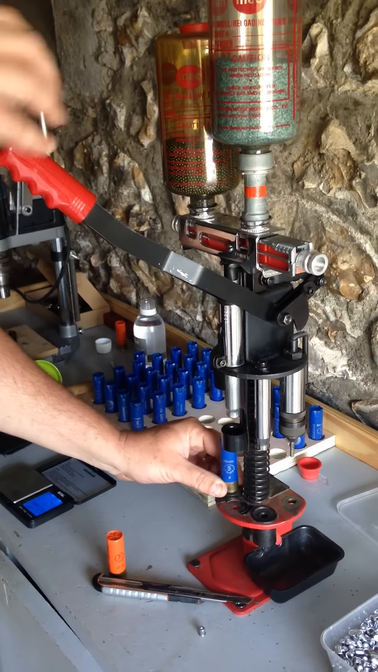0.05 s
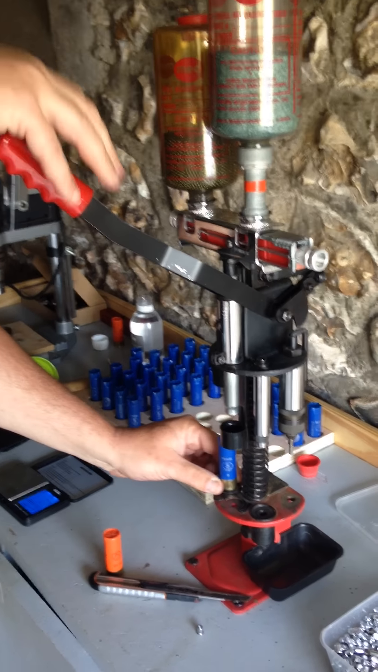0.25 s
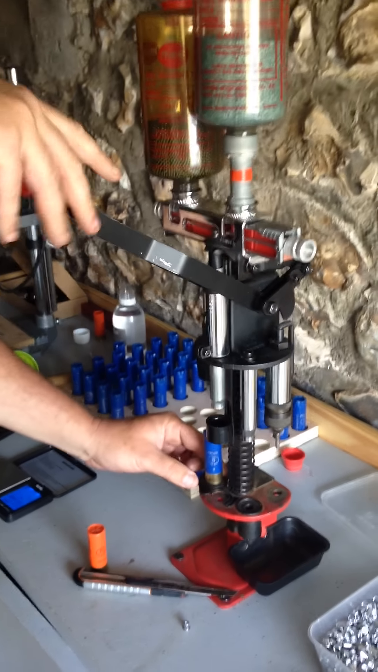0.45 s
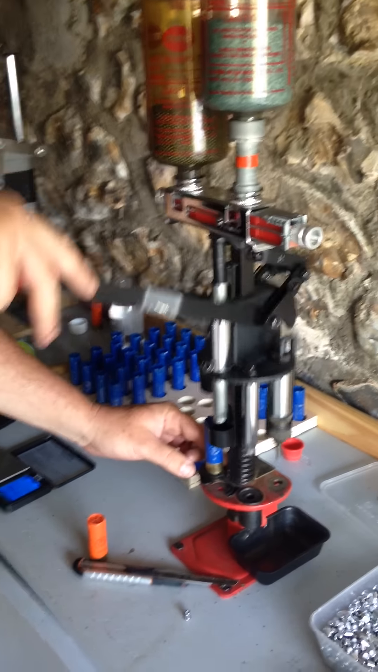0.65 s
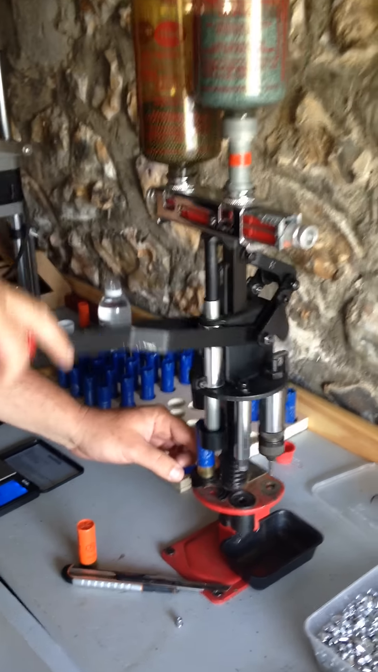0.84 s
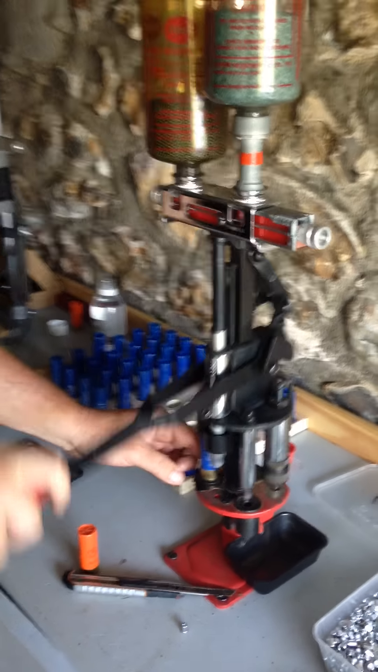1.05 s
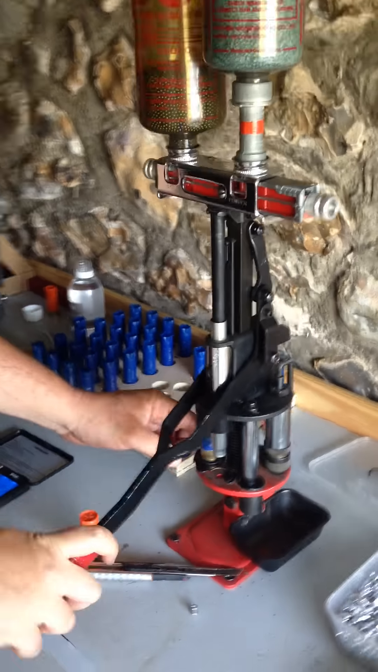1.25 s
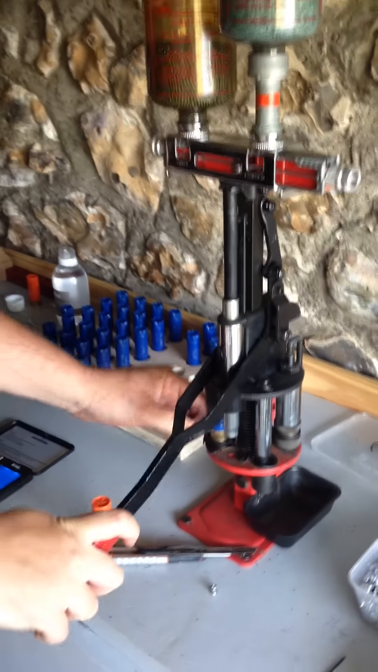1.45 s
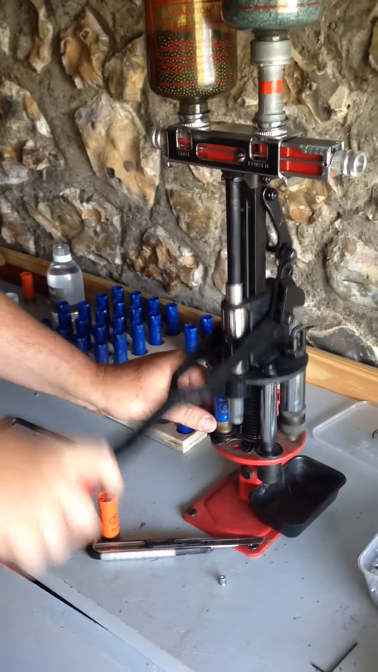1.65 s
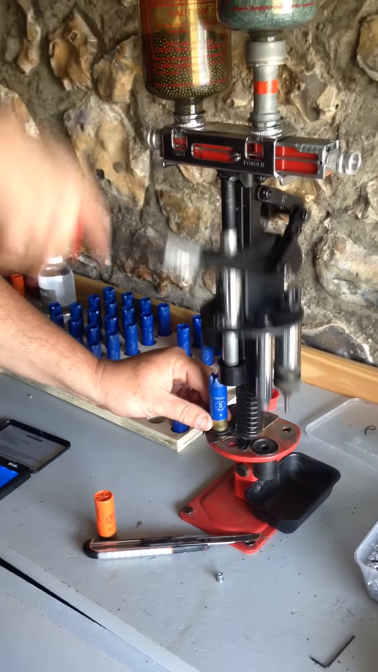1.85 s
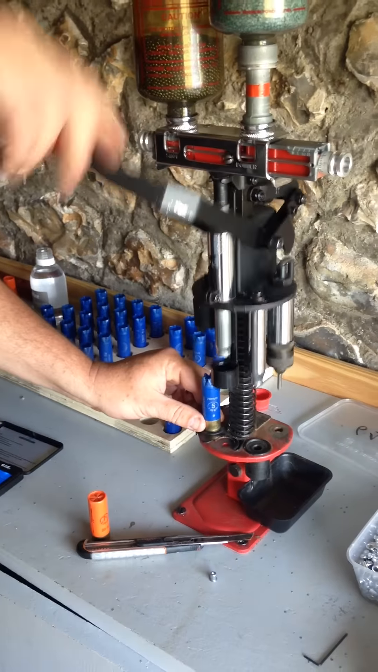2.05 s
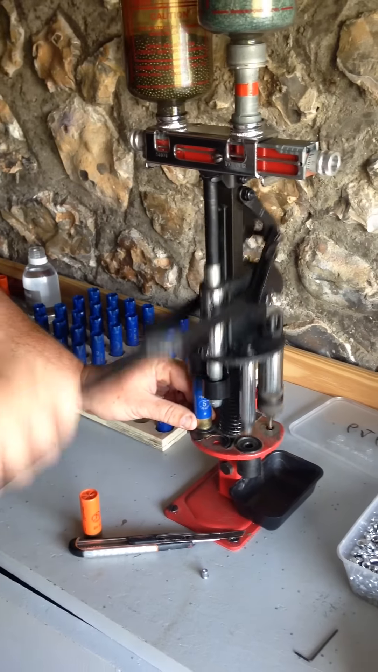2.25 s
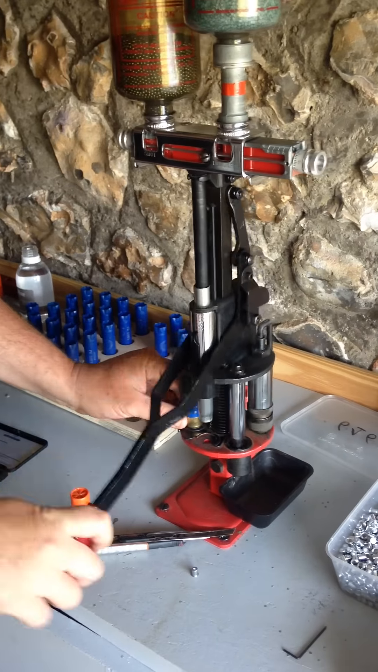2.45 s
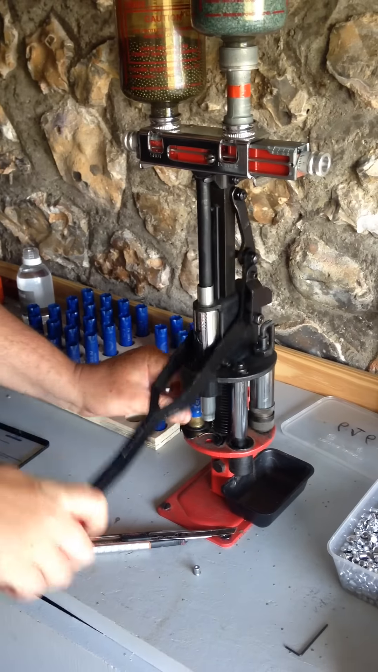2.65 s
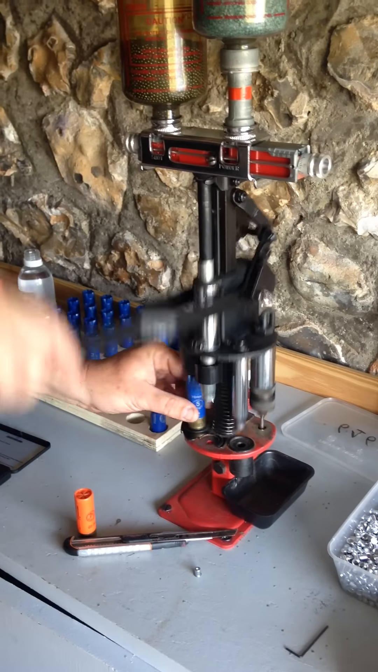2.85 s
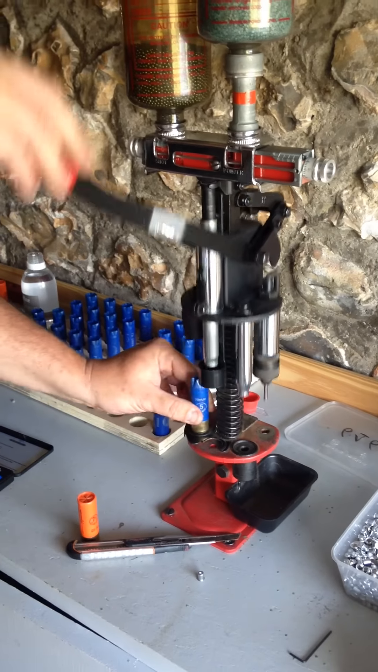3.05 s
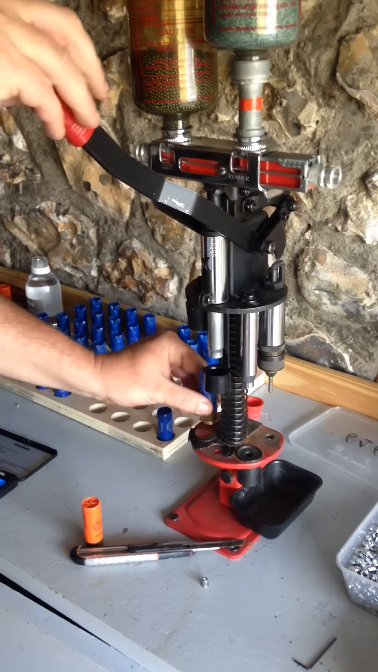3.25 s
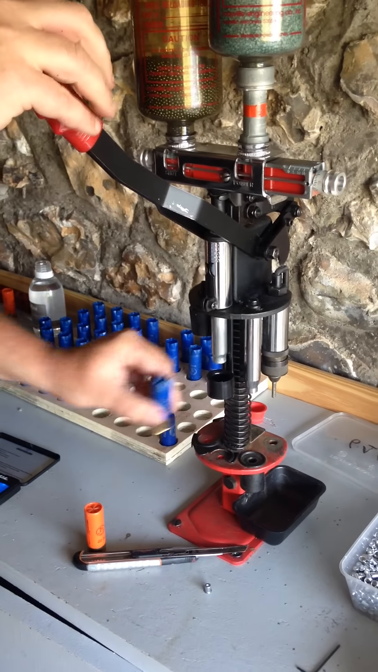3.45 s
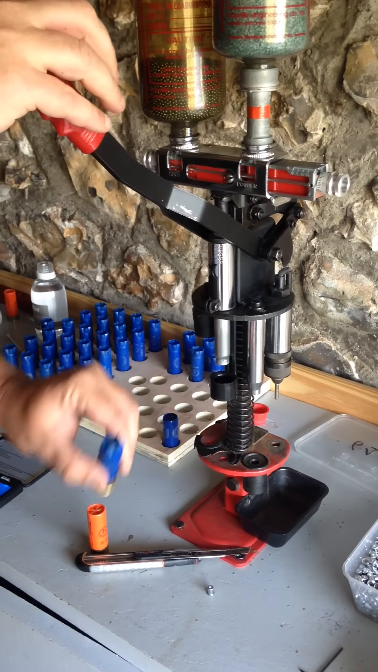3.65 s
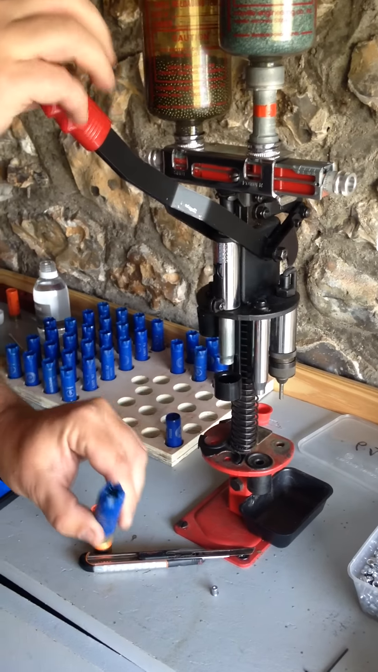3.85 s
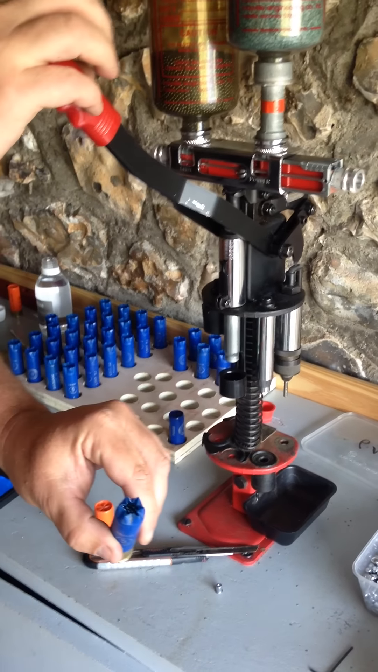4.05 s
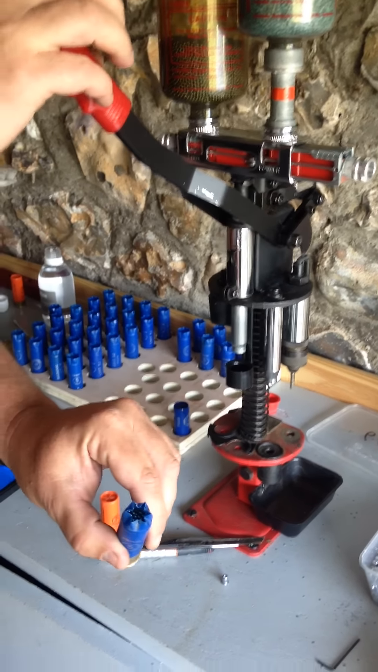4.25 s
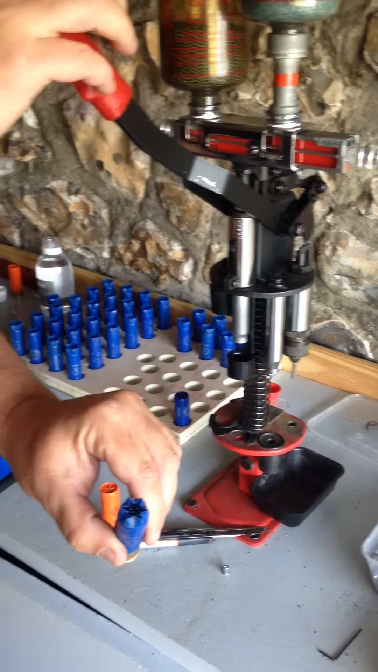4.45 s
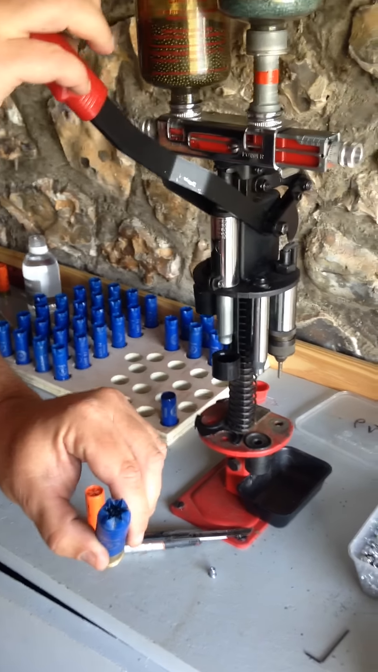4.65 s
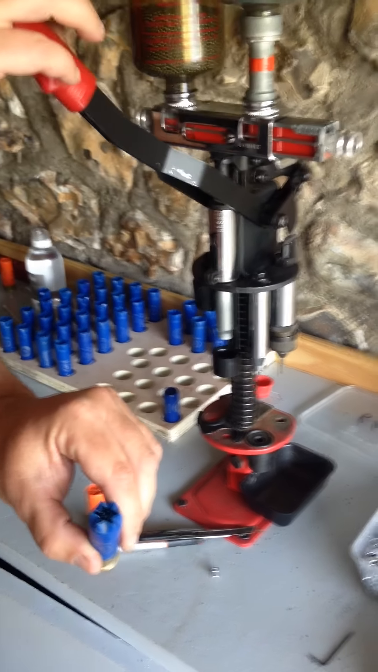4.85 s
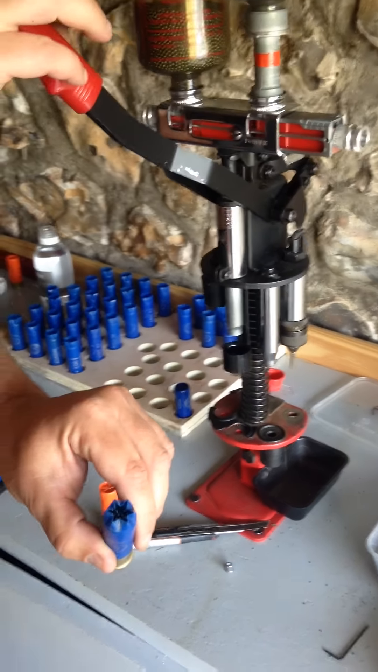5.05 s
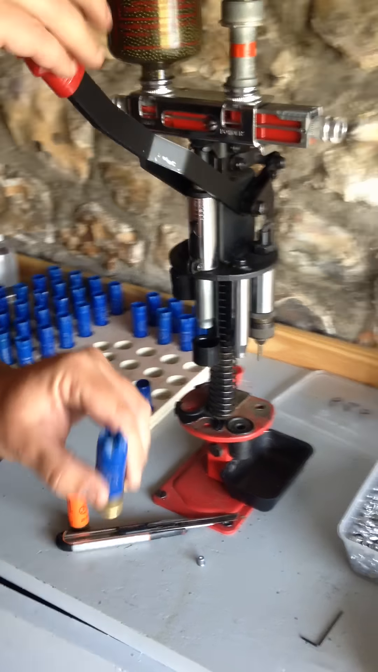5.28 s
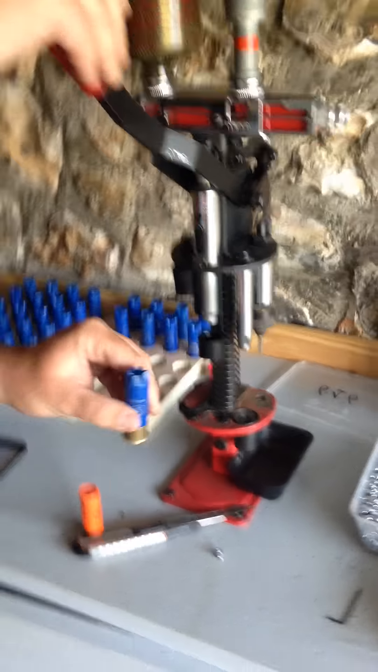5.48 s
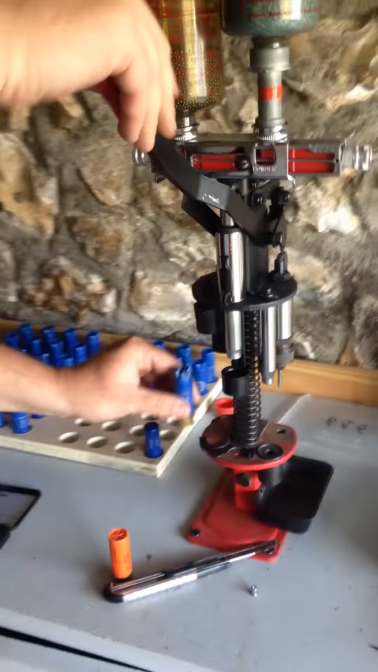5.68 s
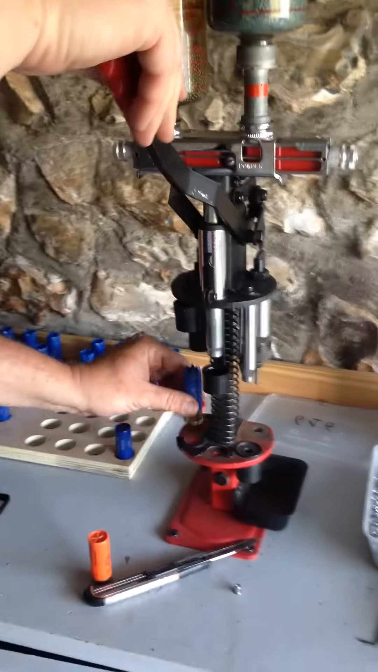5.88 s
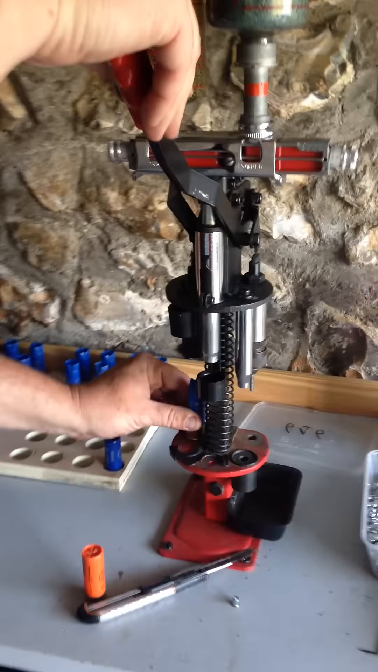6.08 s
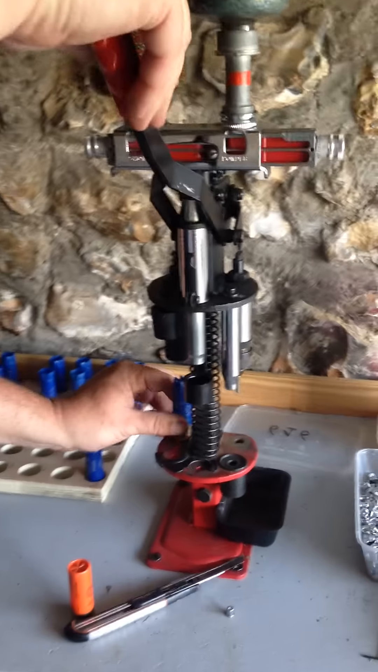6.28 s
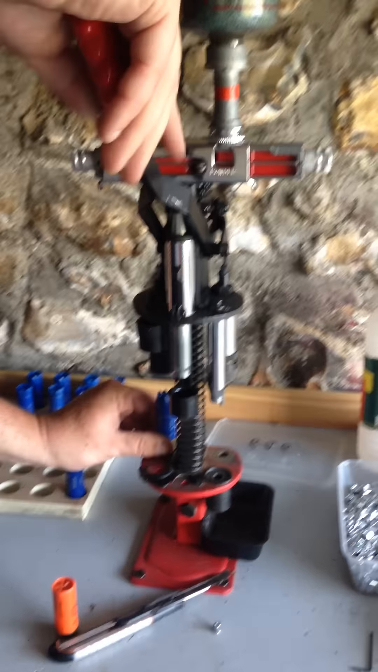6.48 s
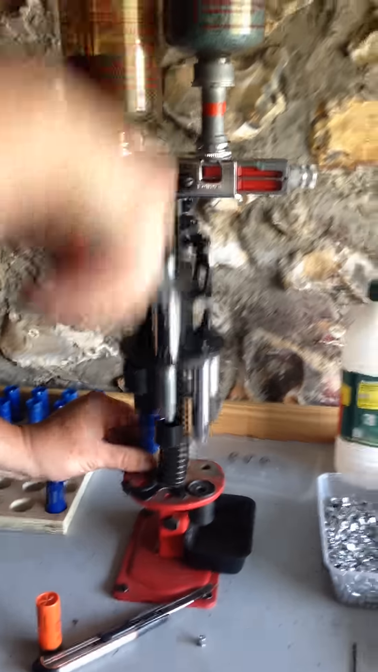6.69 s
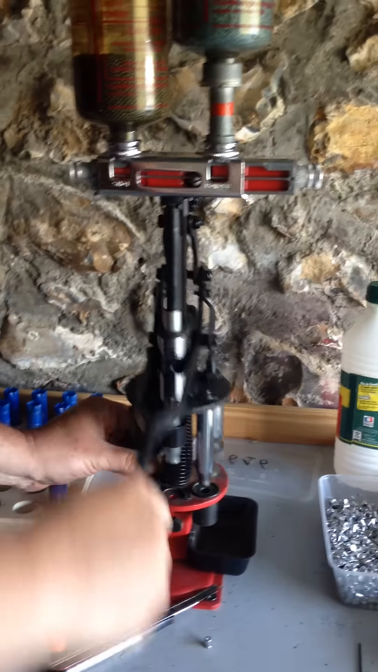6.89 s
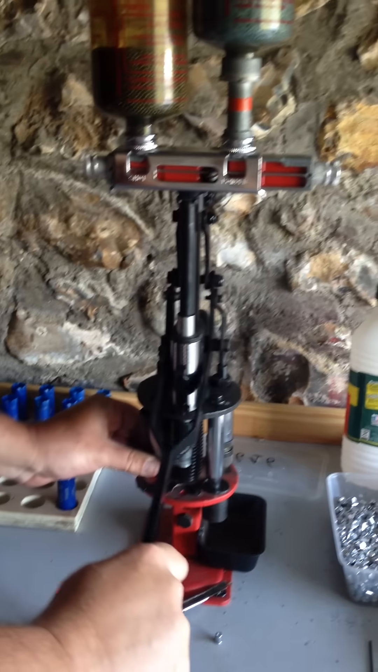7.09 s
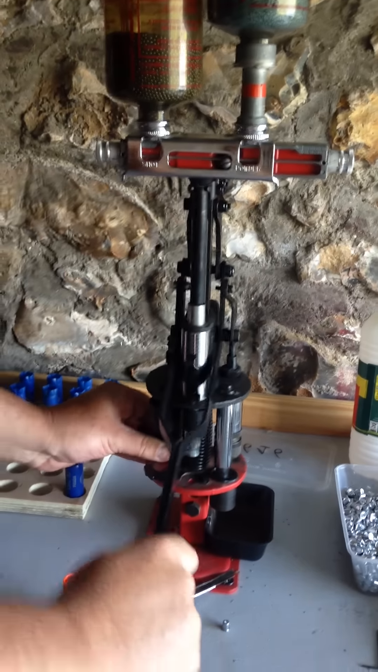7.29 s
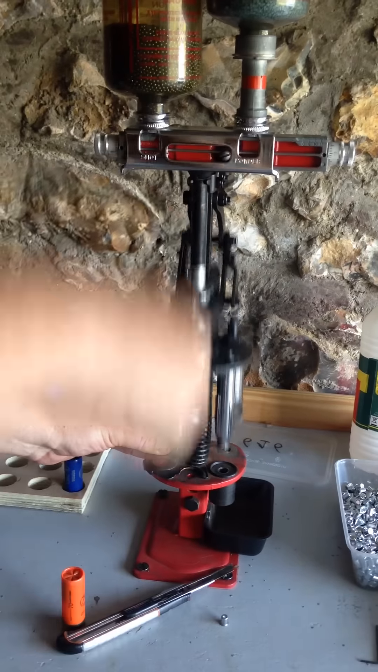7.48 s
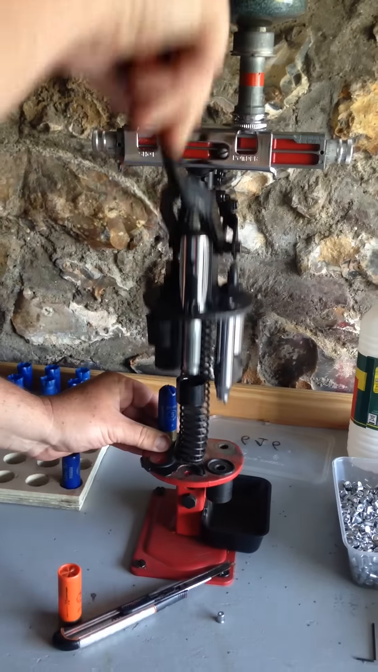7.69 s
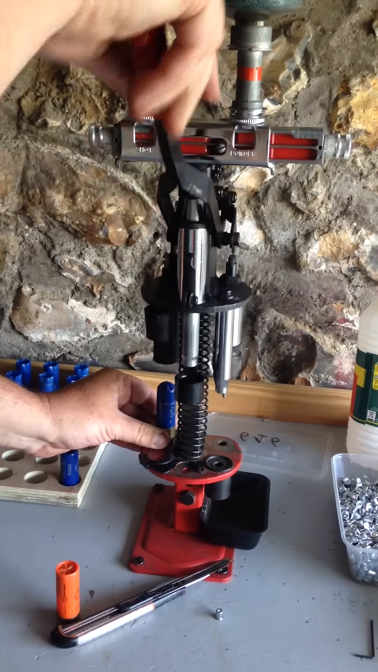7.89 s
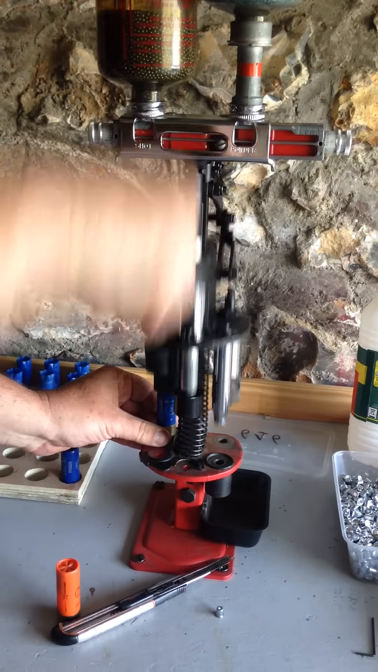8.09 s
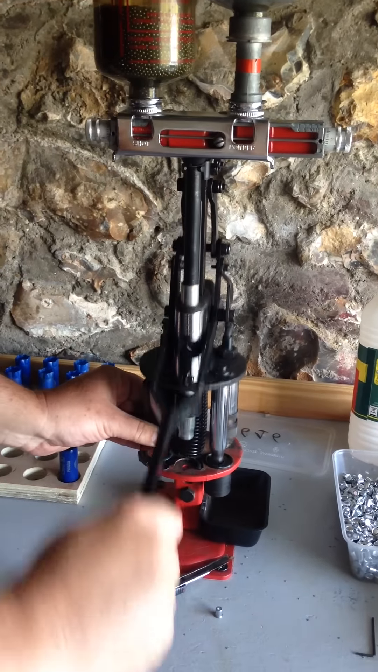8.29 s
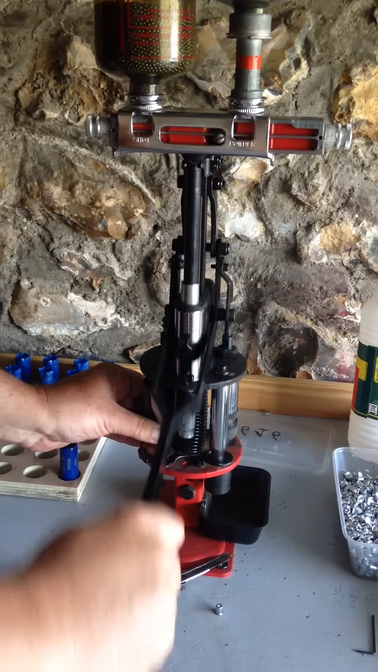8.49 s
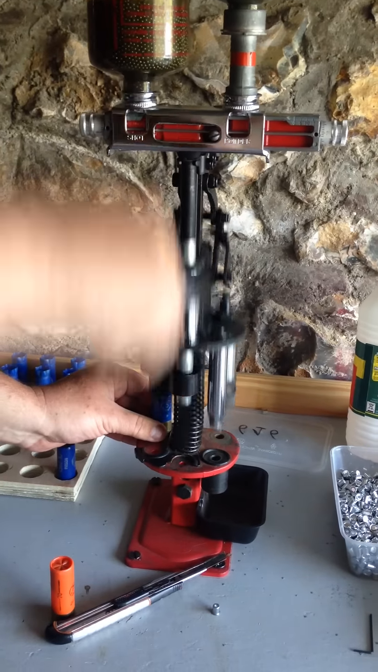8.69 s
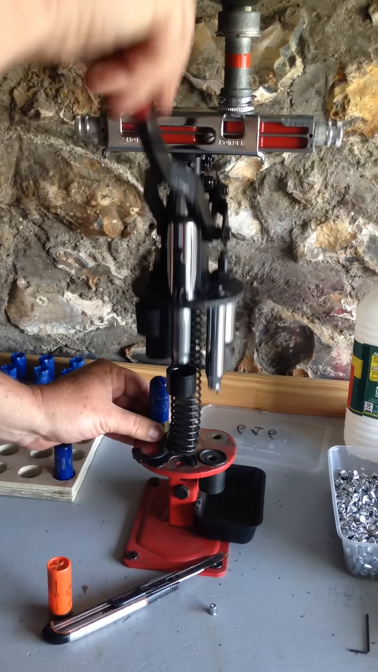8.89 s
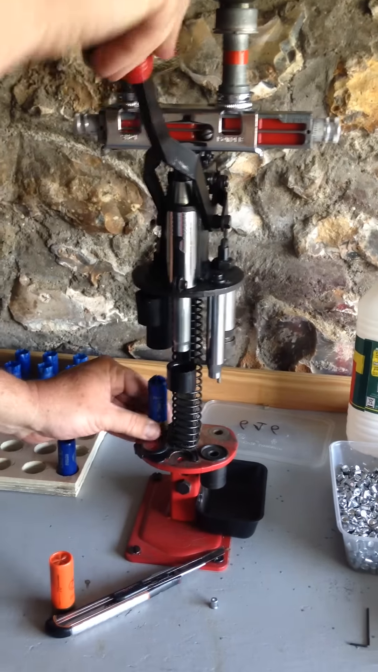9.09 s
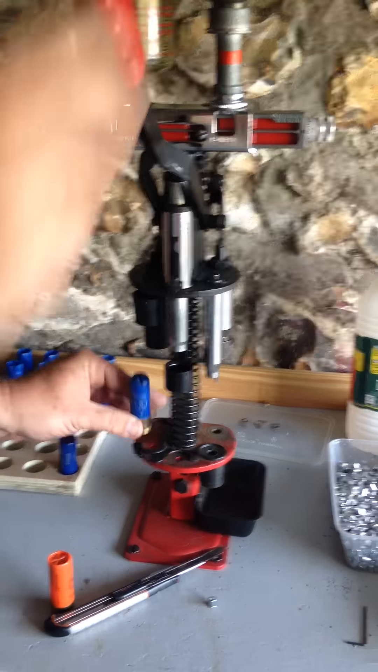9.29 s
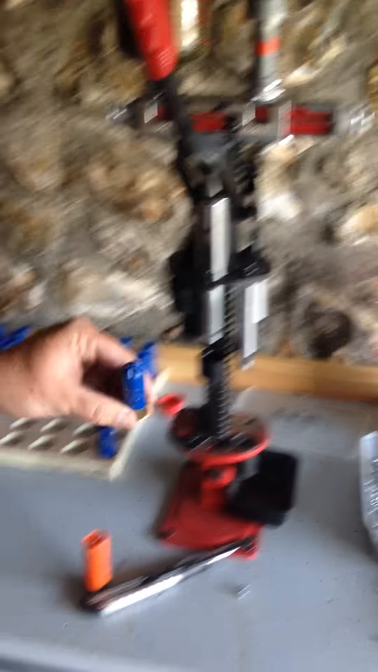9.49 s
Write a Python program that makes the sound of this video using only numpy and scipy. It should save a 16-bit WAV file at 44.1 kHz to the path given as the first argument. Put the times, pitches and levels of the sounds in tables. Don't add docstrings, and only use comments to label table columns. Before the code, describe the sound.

Two bursts of bench-press work, heard close up. First come bright clacks, sharp cam snaps, short steel rings and gritty slides, with hollow hull notes. A lull follows with small ticks and a swelling, fading car outside. Low muffled handling bumps lead to more clacks, pings and rattles from the front, ending in a heavy bench thud and faint taps. Short dull room tail, soft hiss.

```python
import sys
import numpy as np
from scipy import signal
from scipy.fft import rfft, irfft, next_fast_len
from scipy.io import wavfile

SR = 44100
rng = np.random.default_rng(int(sys.argv[2]) if len(sys.argv) > 2 else 0)


def volts_from_db(level):
    exponent = np.asarray(level, float) / 20
    return 10 ** exponent


def waveform_to_disk(signal):
    frames = np.transpose(np.atleast_2d(signal))
    scaled = np.clip(frames, -1, 1) * 32767
    samples = np.round(scaled).astype(np.int16)
    wavfile.write(sys.argv[1], SR, samples)


N = 420273
MOVE_S, REST_S = 5.6, 3.4


def rms_one(x):
    return x / np.sqrt(np.mean(x ** 2) + 1e-20)


def band(x, lo_hz, hi_hz):
    return signal.sosfilt(signal.butter(2, [lo_hz, hi_hz], "band", fs=SR, output="sos"), x)


def resonate(x, hz, width_hz):
    r = np.exp(-np.pi * width_hz / SR)
    poles = [1, -2 * r * np.cos(2 * np.pi * hz / SR), r * r]
    return signal.lfilter([(1 - r * r) / 2, 0, (r * r - 1) / 2], poles, x)


def coloured(x, points):
    size = next_fast_len(N)
    hz = np.maximum(np.arange(size // 2 + 1) * SR / size, 1)
    point_hz, point_db = np.transpose(points)
    gain = volts_from_db(np.interp(np.log(hz), np.log(point_hz), point_db))
    return rms_one(irfft(rfft(x, size) * gain, size)[:N])


def flicker(rate_hz):
    knots = rng.standard_normal(4000)
    return np.interp(np.arange(N) * rate_hz / SR, np.arange(4000), knots)


def grit(per_s, spread_db):
    sizes = volts_from_db(spread_db * np.minimum(rng.exponential(1, N), 5)) * rng.choice([-1, 1], N)
    return sizes * (rng.random(N) < per_s / SR)


def swells(idle_db, s, held_s, level_db, rise_s, fade_s, stop_s):
    t = np.arange(0, N + 64, 64) / SR
    s, held_s, level_db, fade_s = [np.reshape(v, (-1, 1)) for v in (s, held_s, level_db, fade_s)]
    before = np.maximum(s - t, 0)
    after = np.maximum(t - s - np.abs(held_s), 0)
    db = level_db - 20 * (before / rise_s + after / fade_s + (after / stop_s) ** 4)
    power = volts_from_db(2 * idle_db) + np.sum(volts_from_db(2 * db), axis=0)
    return np.interp(np.arange(N) / SR, t, 10 * np.log10(power))


# pitch_hz, level_db per Hz
ROOM_TONE = [(15, -50), (25, -26), (87, -2), (134, -14), (251, -14.5), (303, -31), (826, -26),
             (1210, -26.5), (2380, -44.5), (7230, -42.5), (16300, -60.5)]
# pitch_hz, level_db rms
WHINE = [(7554, -86), (7604, -84), (7654, -89), (12010, -103)]


def room_tone():
    t = np.arange(N) / SR
    whine = sum(np.sqrt(2) * volts_from_db(db) * np.sin(2 * np.pi * hz * t) for hz, db in WHINE)
    hiss = coloured(rng.standard_normal(N), ROOM_TONE)
    return volts_from_db(-51.5 - 7.0) * hiss + whine * volts_from_db(1.4 * flicker(rate_hz=3))


# time_s, tyre_roar_db
CAR = [
    (3.1, -78),
    (3.3, -65),
    (3.6, -66),
    (3.95, -62),
    (4.5, -58.5),
    (4.85, -53),
    (5.35, -52),
    (5.6, -56),
    (6.2, -68),
]


def engine_drone():
    lag_s, over_tyres_db = .08, 1.5
    level_db = np.interp(np.arange(N) / SR - lag_s, *np.transpose(CAR)) + over_tyres_db
    return volts_from_db(level_db) * rms_one(band(band(rng.standard_normal(N), 110, 290), 90, 340))


def tyre_roar():
    air = rng.standard_normal(N)
    humps = 0.6 * rms_one(resonate(air, 630, 120)) + 0.96 * rms_one(resonate(air, 1120, 230))
    return rms_one(rms_one(band(band(air, 400, 1900), 250, 2300)) + humps)


# start_s, peak_db, pitch_hz
BUMPS = [(5.475, -33.5, 230), (5.5155, -22, 125), (5.548, -25, 85), (5.5475, -30, 300), (5.578, -25, 135),
         (5.594, -38, 110), (5.858, -27, 320), (5.885, -38, 250), (5.33, -38, 150), (5.366, -33, 70),
         (5.975, -36, 90), (5.944, -36.5, 82), (6.44, -39, 69), (6.466, -24, 110), (6.4965, -18, 159),
         (6.519, -34.5, 88.8)]


def bumps():
    t, out = np.arange(SR // 8) / SR, np.zeros(N)
    for s, peak_db, hz in BUMPS:
        cycles = t * hz
        push = np.sin(2 * np.pi * cycles) * cycles * np.exp(-cycles / 0.5)
        out[round(s * SR):][:len(t)] -= volts_from_db(peak_db + 11.0) * push
    return out


# scrape_db, rumble_db, boom_db, sway_db
IDLE_DB = (-74, -67, -67, -60)
# start_s, sway_db, boom_db
PUSHES = [(.48, -46, -52), (.75, -47, -66), (1.3, -55, -41), (1.38, -32, -56), (1.54, -42, -48),
          (1.83, -42, -55), (1.97, -48, -47), (2.26, -41, -46), (2.55, -37, -35), (2.65, -31, -50),
          (2.75, -39, -60), (2.89, -37, -56), (3.2, -48, -53), (4.01, -53, -70), (5.32, -45, -45),
          (5.94, -44, -50), (6.29, -47, -60), (6.43, -39, -48), (6.82, -55, -45), (7.08, -68, -42),
          (7.53, -36, -40), (7.69, -42, -46), (8.14, -41, -44), (8.33, -48, -40), (8.4, -45, -48),
          (8.65, -37, -49), (8.76, -41, -56), (9.08, -36, -46), (9.21, -35, -52), (9.47, -46, -66)]


def push_levels():
    s, sway, boom = np.transpose(PUSHES)
    rise_s, fade_s = .11, .16
    boom_db = swells(IDLE_DB[2], s, 0, boom, rise_s, fade_s, 1)
    sway_db = swells(IDLE_DB[3], s, 0, sway, rise_s, fade_s, 1)
    return boom_db, sway_db


def bench_wobble(level_db):
    push = rms_one(resonate(rng.standard_normal(N), 69, 44))
    return band(resonate(volts_from_db(level_db + 3.5) * push, 69, 22.5), 42, 220)


# start_s (at full speed), held_s, scrape_db, rumble_db, fade_s (for 20 dB)
SLIDES = [(.49, 0.01, -72, -47, .1), (.66, .1, -58, -56, .1), (1.05, .06, -55, -50, .1),
          (1.22, .04, -35, -31, .04), (1.395, .025, -34, -40, .055), (1.575, .01, -47, -56, .05),
          (1.735, .015, -49, -40, .04), (1.83, .18, -44.5, -43, .09), (2.25, 0.07, -38, -45, .15),
          (2.48, .02, -44, -33, .15), (2.59, 0.015, -35, -39, .08), (2.81, .05, -60, -54, .2),
          (2.96, 0.01, -50, -47, .35), (3.21, .06, -56, -51, .1), (4.75, .11, -54, -60, .15),
          (5.33, .03, -57, -75, .09), (6.11, 0.01, -54, -54, .2), (6.33, 0.09, -65, -61, .2),
          (6.78, 0.04, -43, -42, .6), (7.01, 0.01, -54, -56, .35), (7.61, .08, -42.5, -43, .16),
          (8.17, 0.01, -47, -51, .15), (8.27, 0.06, -48, -47, .1), (8.69, .16, -48, -47, .3),
          (9.22, 0.02, -57, -58, .15)]


def slide_levels():
    s, held_s, scrape, rumble, fade_s = np.transpose(SLIDES)
    rise_s, stop_s = .09, .28
    scrape_db = swells(IDLE_DB[0], s, held_s, scrape, rise_s, fade_s, stop_s)
    rumble_db = swells(IDLE_DB[1], s, held_s, rumble, rise_s, fade_s, stop_s)
    tyres_db = np.interp(np.arange(N) / SR, *np.transpose(CAR))
    return scrape_db, np.maximum(rumble_db, tyres_db)


# pitch_hz, level_db per Hz
SCRAPE = [(1060, -26.5), (1800, -10), (2900, -12.5), (3410, -3), (12800, -14), (15150, -9), (15500, -26),
          (16000, -45)]
# pitch_hz, side_db, front_db
SLIDE = [(650, 0, -7), (1150, -3, -6), (1440, -6, 4), (1720, -5, -9), (1900, -10, -2), (4800, -14, -6)]
# pitch_hz, side_db, front_db, ring_share (of the ring time)
BENCH = [(181, 1, -5.5, 2.3), (298, -2, -1.5, 1.1), (356.6, -11.5, -3.0, 1.6)]
FRAME = [(627.4, 8, -4.5, 0.44), (725, 3, -2, 0.52), (983, 0.5, -3.5, .8), (1122, 0.5, -2, 0.38),
         (1160, -15, -16, 0.34), (1405, -16, -1.5, 1.2)]
LINKAGE = [(1760, -8, -9, .7), (1895, -9, -4, .8), (2140, -8, -8, .6), (2430, -2, -3, .6),
           (2632, -4, -7, .7), (3085, -4, -7, .6), (3830, -8, -7, .5), (4140, -4, -8, .5),
           (4340, -4, -7, .5)]
TICK = [(5990, -1, -1, .7), (6900, -3, -4, .6), (7430, -1, -3, .6), (7850, -6, -4, .5), (8545, -2, -3, .6),
        (9500, -7, -7, .5)]


def carriage(scrape_db, rumble_db, boom_db):
    t = np.arange(N) / SR
    late = np.clip((t - MOVE_S) / .5, 0, 1)
    busy = np.clip(np.maximum(REST_S - t, t - MOVE_S) / .2, 0, 1)
    slip = grit(per_s=5000, spread_db=2.3)

    def body(modes, width_hz):
        return rms_one(sum(resonate(slip, hz, width_hz) * volts_from_db(side + late * (front - side))
                           for hz, side, front, *_ in modes))

    jerk_db = 3.0 * flicker(rate_hz=34) * busy
    edges = 700 * 2 ** np.arange(0, 5, .75)
    patchy = 0
    for lo, hi in zip(edges, edges[1:]):
        delay = int(lo)
        patchy = patchy + volts_from_db(np.roll(jerk_db, delay)) * band(np.roll(slip, delay), lo, hi)
    hiss = rms_one(coloured(patchy, SCRAPE) + .5 * body(LINKAGE + TICK, width_hz=110))
    rumble = rms_one(rms_one(band(slip, 420, 1600)) + 1.6 * body(SLIDE, width_hz=50))
    boom = rms_one(rms_one(band(slip, 110, 610)) + 0.33 * body(BENCH, width_hz=35))
    mid = busy * rumble + (1 - busy) * tyre_roar()
    return volts_from_db(scrape_db - 4.5) * hiss + volts_from_db(rumble_db + jerk_db - 1.0) * mid + volts_from_db(boom_db - 2.05) * boom


# start_s, peak_db, centre_hz
TAPS = [(.468, -46, 7200), (.755, -44, 6500), (1.1815, -21, 4200), (1.264, -26, 1000), (2.199, -30, 3200),
        (2.7075, -42, 6000), (2.768, -40, 9000), (4.691, -48, 5200), (4.738, -44, 6000), (4.753, -40, 3000),
        (4.791, -36, 2500), (4.794, -33, 5500), (4.8255, -23, 2000), (4.8455, -22, 2500),
        (6.206, -29, 3800), (6.278, -50, 11000), (6.3935, -20, 5000), (6.801, -34, 4000),
        (6.824, -36, 5000), (7.021, -30, 2500), (7.127, -44, 5500), (7.44, -48, 5500), (1.161, -32, 2200),
        (8.615, -54, 6500), (8.731, -12, 1500), (3.92, -58, 4000), (5.63, -58, 4000), (6.654, -52, 1500)]
# start_s, peak_db, centre_hz
SHAKES = [(.691, -34, 11000), (1.347, -33, 8000), (1.575, -42, 9000), (7.606, -41, 10000),
          (2.18, -35, 12000), (2.223, -23, 11500), (6.765, -29, 11000), (8.126, -28, 11700),
          (8.728, -34, 11000), (4.847, -39, 4000), (1.872, -38, 9500), (6.016, -40, 2800)]


def taps():
    size = SR // 8
    tap_cycles, tap_s, shake_s = 14, .004, .11
    t, out = np.arange(size) / SR, np.zeros(N + size)
    grain = rng.standard_normal((50, size))
    touches = [(*row, tap_s) for row in TAPS] + [(*row, shake_s) for row in SHAKES]
    for (s, peak_db, hz, fade_s), noise in zip(touches, grain):
        fade = volts_from_db(-60 * t / (tap_cycles / hz + fade_s))
        touch = band(noise * fade, hz / 1.5, min(hz * 1.5, 16000))
        out[round(s * SR):][:size] += volts_from_db(peak_db) * touch / np.abs(touch).max()
    return out[:N]


# start_s, peak_db, pitch_hz, ring_s
POCKS = [
    (0.446, -27.5, 558, 0.08),
    (0.6915, -12.5, 649, 0.085),
    (1.515, -28, 836, 0.11),
    (1.833, -19, 720, 0.1),
    (2.222, -16.5, 700, 0.056),
    (2.919, -14, 698, 0.071),
    (2.92, -14.5, 1120, 0.06),
    (6.764, -18, 915, 0.042),
    (8.73, -14.5, 850, 0.06),
    (9.077, -7, 725, 0.027),
]
# start_s, peak_db, pitch_hz, ring_s
PINGS = [
    (1.1867, -15, 2405, 0.054),
    (4.127, -38, 1786, 0.055),
    (4.8235, -21, 2054, 0.029),
    (4.8479, -19, 2100, 0.033),
    (6.0152, -29, 1850, 0.045),
    (7.029, -21, 1477, 0.066),
    (7.9933, -32, 1934, 0.039),
    (8.3646, -12.5, 1400, 0.06),
    (9.1905, -29, 1470, 0.045),
    (9.3008, -37.5, 1440, 0.05),
]


def hollow_notes(split):
    size = SR // 4
    t, out = np.arange(size) / SR, np.zeros(N + size)
    for s, peak_db, hz, ring_s in list(POCKS) + list(PINGS):
        pair = np.sin(2 * np.pi * hz * t) + 0.83 * np.sin(2 * np.pi * hz * (1 + split) * t)
        fade = volts_from_db(-60 * t / np.clip(ring_s, .02, .25)) * (1 - np.exp(-t / 0.00052))
        out[round(s * SR):][:size] += volts_from_db(peak_db - 5.5) * pair * fade
    return out[:N]


# start_s, peak_db, pitch_hz, ring_s
SIDE_RINGS = [(.693, -22, 1100, .12), (1.183, -24, 6008, .07), (1.183, -25, 6890, .05),
              (1.183, -23, 4243, .05), (1.187, -19, 2632, .06), (1.241, -19, 1130, .035),
              (1.238, -30, 4000, .04), (1.027, -36, 720, .03), (1.349, -24, 720, .08),
              (.556, -38, 2500, .04), (1.546, -33, 2304, .06), (1.795, -22, 721, .06),
              (1.795, -27, 7537, .07), (1.795, -28, 1798, .05), (1.797, -30, 8545, .08),
              (1.832, -19, 646, .07), (1.834, -24, 2434, .05), (2.123, -37, 2283, .05),
              (2.179, -24, 3682, .025), (2.179, -25, 5093, .025), (2.289, -26, 690, .06),
              (2.426, -15, 4200, .06), (2.425, -21, 1238, .07), (2.425, -20, 7052, .04),
              (2.425, -22, 5889, .05), (2.426, -22, 7454, .05), (2.441, -24, 603, .08),
              (2.443, -27, 2875, .06), (2.472, -20, 1163, .05), (2.469, -23, 528, .07),
              (2.557, -22, 1540, .05), (2.708, -31, 409, .09), (2.708, -34, 1174, .09),
              (2.875, -22, 7547, .08), (2.875, -27, 4134, .05), (2.876, -29, 8545, .08),
              (2.921, -18, 2433, .05), (4.13, -40, 650, .07), (4.778, -42, 2132, .03),
              (4.792, -38, 2130, .05)]
# start_s, peak_db, pitch_hz, ring_s
FRONT_RINGS = [(5.842, -40, 1750, .04), (6.171, -36, 1529, .05), (6.172, -30, 2500, .03),
               (6.393, -32, 5050, .04), (6.394, -35, 4447, .05), (6.764, -30, 388, .07),
               (6.766, -34, 2500, .06), (6.943, -31, 5373, .04), (6.943, -33, 5782, .04),
               (6.982, -33, 560, .05), (7.027, -18, 2509, .065), (7.027, -23, 2315, .06),
               (7.027, -27, 5975, .13), (7.029, -31, 8545, .05), (7.093, -32, 480, .1),
               (7.154, -33, 1066, .05), (7.397, -32, 2509, .08), (7.397, -33, 1486, .06),
               (7.51, -24, 3844, .05), (7.51, -27, 5168, .05), (7.511, -29, 7537, .09),
               (7.512, -33, 8545, .11), (7.564, -22, 1195, .05), (7.562, -26, 345, .08),
               (8.127, -32, 1906, .06), (8.362, -15, 2422, .06), (8.362, -21, 5965, .06),
               (8.393, -26, 1420, .04), (8.39, -26, 345, .07), (8.429, -29, 2713, .07),
               (8.452, -30, 1430, .05), (8.596, -34, 786, .12), (8.669, -24, 7547, .09),
               (8.669, -27, 4016, .05), (8.729, -24, 2003, .05), (9.08, -17, 930, .06),
               (9.079, -23, 1130, .05), (9.079, -27, 2400, .05), (9.078, -13, 355, .12),
               (9.1, -23, 1010, .09), (9.124, -28, 860, .07), (9.191, -34, 1970, .05),
               (6.054, -43, 1950, .06)]


def steel_notes():
    size = SR // 4
    t, out = np.arange(size) / SR, np.zeros(N + size)
    for s, peak_db, hz, ring_s in list(SIDE_RINGS) + list(FRONT_RINGS):
        fade = volts_from_db(-60 * t / np.clip(.75 * ring_s, .015, .25)) * (1 - np.exp(-t / 0.0012))
        gap_hz = 62 * (hz / 2500) ** .7
        cluster = np.zeros(size)
        for step, share in ((0, 1), (-1, .55), (1.6, .45)):
            cluster += share * np.sin(2 * np.pi * (hz + step * gap_hz) * t + step * hz)
        out[round(s * SR):][:size] += volts_from_db(peak_db) * cluster * fade
    return out[:N]


# low_hz, high_hz, modes_db, clatter_db, clatter_share (of the ring time)
PARTS = [
    (1500, 5820, -20, -14.5, 0.75),
    (130, 485, -4.5, 1.5, 1.34),
    (520, 1553, -13, 0, 0.82),
    (4600, 13000, -18, -14, 0.93),
]
# start_s, linkage_peak_db, frame_weight_db (relative), tick_db (relative)
SNAPS = [(.5557, -32, -2, -18), (1.0955, -34, 4, -20), (1.347, -10.5, -8, -13), (1.3725, -18, -13, 0.5),
         (1.627, -39, 8, -17), (1.968, -35.5, 2, -18), (2.1232, -22, -5, -28), (2.5575, -8.5, -12, -19),
         (2.576, -30, -10, 3), (2.829, -35.5, -3, -26), (2.922, -8.5, -9, -21), (4.8225, -26, -13, -34),
         (4.8462, -16.5, -18, -16), (6.0135, -17, -17, -6), (6.1715, -17, -18, -16), (6.3932, -15, -28, -9),
         (6.9428, -17.5, -16, -9), (7.492, -37, -8, -32), (7.866, -42, 2, -10), (8.3374, -25, -16, -24),
         (9.1902, -30, -10, -33), (9.3003, -37, -6, -40)]
CLACKS = [(.4455, -25, -4, -34), (.6913, -19.5, -2, -3.5), (1.0267, -52, 11, -4), (1.0718, -31, -7, -26),
          (1.137, -15, -13, -32), (1.1825, -5, -18, -6), (1.2325, -15, -5, -7.5), (1.3345, -22.5, -6, -24),
          (1.4816, -39, 3, -28), (1.5134, -52, 16, -22), (1.6946, -33, -16, -32), (1.7949, -13, -16, -8),
          (1.8319, -15, -3, -9), (2.003, -30, -3, -6.5), (2.222, -20.5, 3, -1), (2.2903, -37, 6, -13),
          (2.425, -3, -22, -6.5), (2.4675, -16, -11, -3), (2.8751, -13.5, -16, -9), (2.9748, -29, -12, -9),
          (3.4274, -51, -3, -9.5), (4.1271, -46, 6, -29.5)]
LATE_CLACKS = [(5.8417, -41, -6, -28), (6.2067, -34, -27, -32), (6.7078, -51, -18, -3),
               (6.7635, -21, -5, -6), (6.9826, -26.5, -5, -15), (7.0255, -11.5, -16, -14),
               (7.095, -21, -9, -15), (7.1531, -22, -13, -18), (7.3955, -25, -16, -48),
               (7.5095, -10, -16, -17), (7.5628, -22.5, -2, -14), (7.9938, -34.5, -5, -32),
               (8.126, -26, -6, -5), (8.643, -27, -2, -9), (8.6688, -13, -17, -9), (8.7294, -13, -4, -9.5),
               (9.238, -51, -12, 0)]
RATTLES = [(.9089, -45, -15, -20), (.932, -42, -12, -14), (1.546, -28.5, -9, -18), (1.7111, -24, -3, -12),
           (2.178, -24, -18, -9), (2.708, -24, -11, -23), (2.762, -34, -20, -3), (3.082, -37, -6, -17),
           (3.225, -38, -11, -18), (4.7023, -52, -4, -5.5), (4.7414, -39, -19, -6), (4.756, -40, -14, -7),
           (4.79, -33, -14, -13), (5.3211, -43, -5, -13), (6.105, -43, -8, -22), (7.6811, -30, -7, -5),
           (7.707, -38, -8, -16), (8.11, -41, -12, -1), (8.2238, -36.5, -5, -19), (8.2722, -30, -26, -23),
           (8.3618, -8.5, -19, -6.5), (8.4289, -18.5, -9, -14), (8.902, -28, -8, -14)]
THUDS = [
    (2.694, -40, -1, -23),
    (5.1974, -55, 3, -11),
    (5.2837, -46, -4, -14),
    (5.87, -44, 0.5, -16.5),
    (8.595, -54, 18, -18),
    (9.0766, -14, -5.5, -21),
    (9.0938, -23, -16, -18),
]


def knocks(spread_db, contact_s, crack_s, crack_db, rattle_db):
    size = SR // 4
    clock, out = np.arange(size) / SR, np.zeros(N + size)
    rattle = volts_from_db(rattle_db * np.pad(flicker(rate_hz=250), (0, size)))
    clatter = []
    for lo, hi, *_ in PARTS:
        noise = band(rng.standard_normal(N + size), lo, hi)
        noise = band(noise, lo / 1.37, min(hi * 1.45, 17000))
        uneven = np.roll(rattle, int(lo) * (lo > 4000))
        clatter.append(rms_one(uneven * noise))
    # contacts, bench thud over frame in dB, ring time in s
    kinds = [(SNAPS, -7, .056), (CLACKS, -11, .105), (LATE_CLACKS, -9, .106),
             (RATTLES, -8, .19), (THUDS, 2.5, .09)]
    blows = [(*row, bench_db, ring_s) for rows, bench_db, ring_s in kinds for row in rows]
    luck = rng.standard_normal((120, 3, 30))
    for (s, peak_db, weight, tick, bench_db, ring_s), (strength, detune, phase) in zip(blows, luck):
        at, k = round(s * SR), 0
        part_levels = (0, weight + bench_db, weight, tick)
        bodies = zip((LINKAGE, BENCH, FRAME, TICK), PARTS, part_levels, clatter)
        for modes, (low_hz, _, modes_db, clatter_db, clatter_share), part_db, noise in bodies:
            hz, side_db, front_db, share = np.transpose(modes)[:, :, None]
            t = clock[:int(SR * ring_s * max(share.max(), clatter_share))]
            pick = slice(k, k + len(modes))
            k += len(modes)
            heard_db = side_db if s < MOVE_S else front_db
            gain = volts_from_db(heard_db + modes_db + spread_db * strength[pick, None])
            bent_hz = hz * (1 + 0.008 * detune[pick, None])
            wave = np.sin(2 * np.pi * bent_hz * t + 2 * phase[pick, None])
            sound = np.sum(gain * wave * volts_from_db(-60 * t / (ring_s * share)), axis=0)
            sound += volts_from_db(clatter_db - 60 * t / (ring_s * clatter_share)) * noise[at:at + len(t)]
            rise = 1 - np.exp(-t / (contact_s + 0.73 / low_hz))
            crack = 1 + volts_from_db(crack_db) * np.exp(-t / crack_s)
            out[at:at + len(t)] += volts_from_db(peak_db + part_db) * rise * crack * sound
    return out[:N]


def walls(x):
    t = np.arange(SR // 2) / SR
    t60_s, level_db = 0.23, -14
    tail = band(rng.standard_normal(len(t)), 120, 3600) * volts_from_db(-60 * t / t60_s) * (t > .004)
    return volts_from_db(level_db) * signal.fftconvolve(x, tail / np.sqrt(np.sum(tail ** 2)))[:N]


def scene():
    background = room_tone() + engine_drone() + bumps()
    boom_db, sway_db = push_levels()
    scrape_db, rumble_db = slide_levels()
    blows = knocks(spread_db=2.5, contact_s=0.0014, crack_s=0.002, crack_db=4.5, rattle_db=4.0)
    blows = blows + hollow_notes(split=0.088)
    press = blows + walls(blows) + carriage(scrape_db, rumble_db, boom_db)
    return (background + bench_wobble(sway_db) + press + taps() + steel_notes())[None]


def band_limit(x):
    return signal.sosfilt(signal.butter(12, 16460, fs=SR, output="sos"), x)


def record(dry):
    cut = signal.sosfilt(signal.cheby2(10, 50, 16500, fs=SR, output="sos"), dry)
    return band_limit(cut)


dry = scene()
out = record(dry)
waveform_to_disk(out)
```